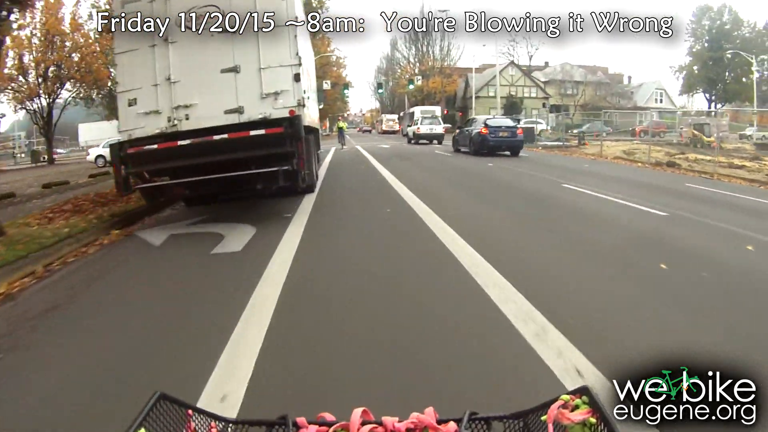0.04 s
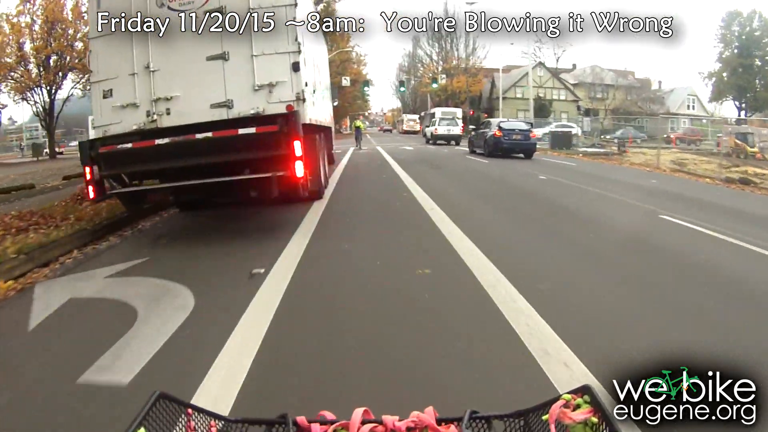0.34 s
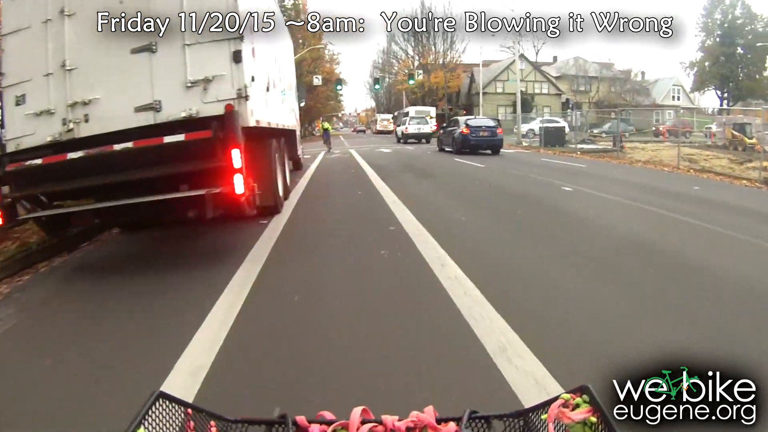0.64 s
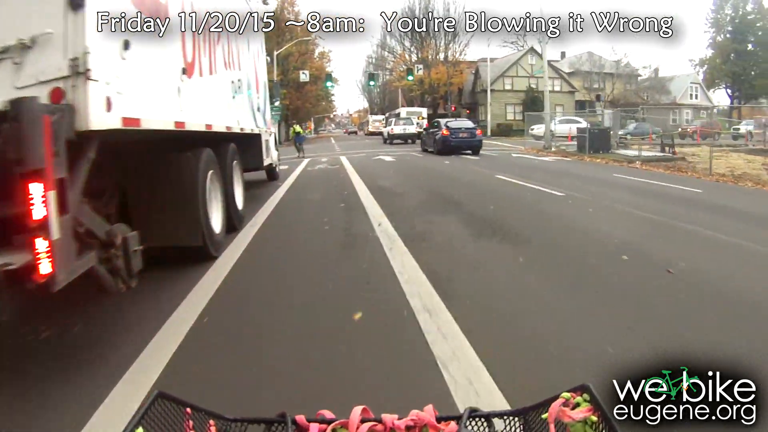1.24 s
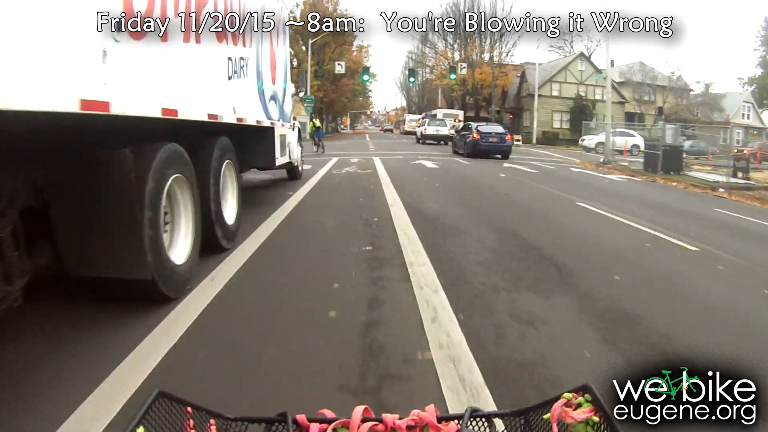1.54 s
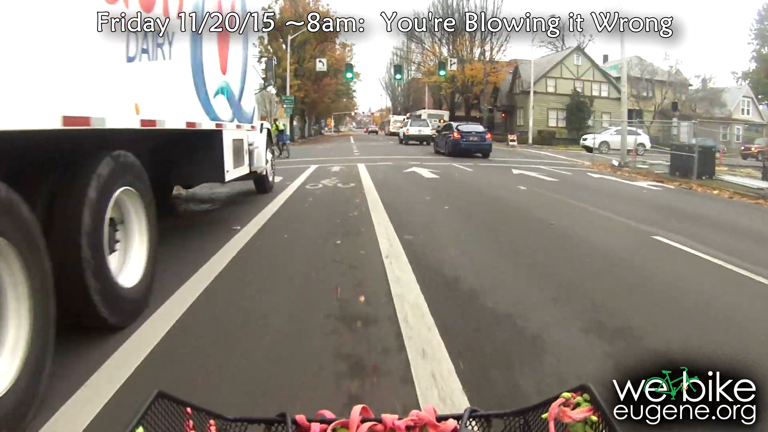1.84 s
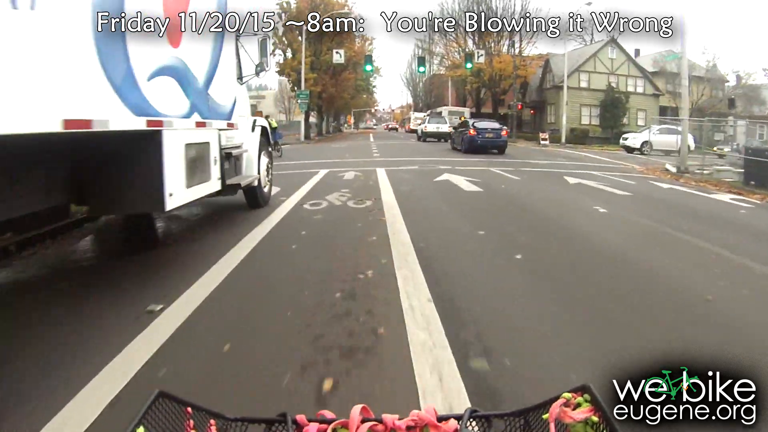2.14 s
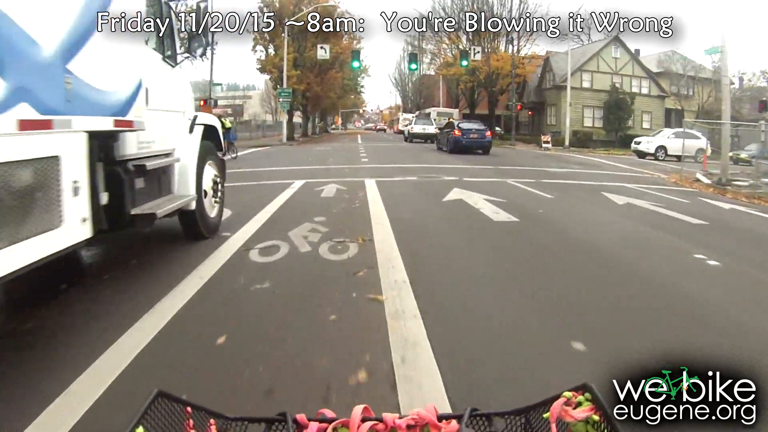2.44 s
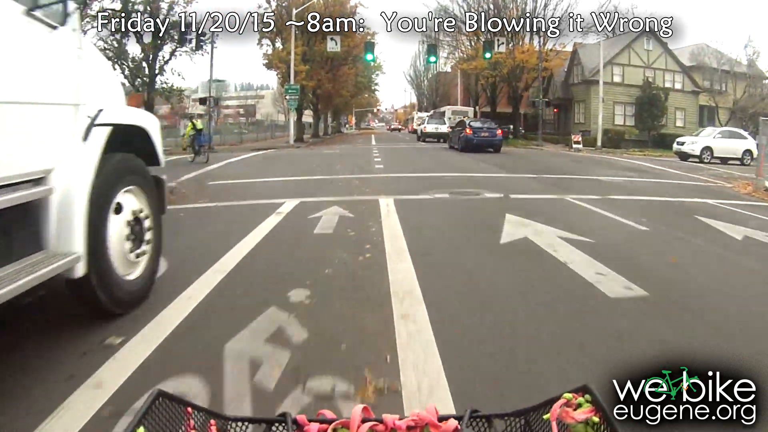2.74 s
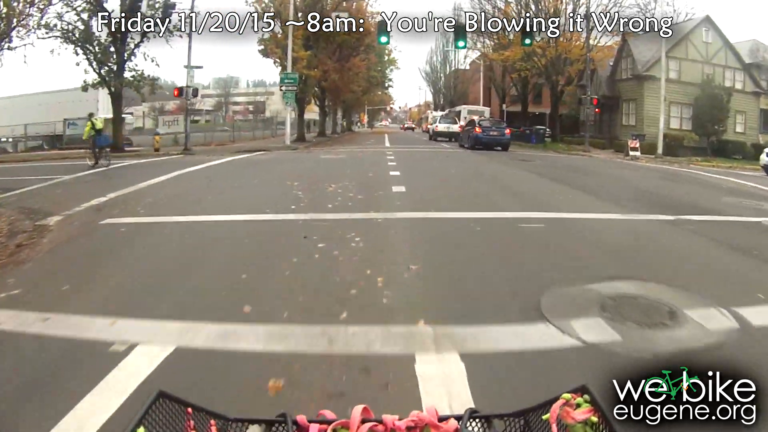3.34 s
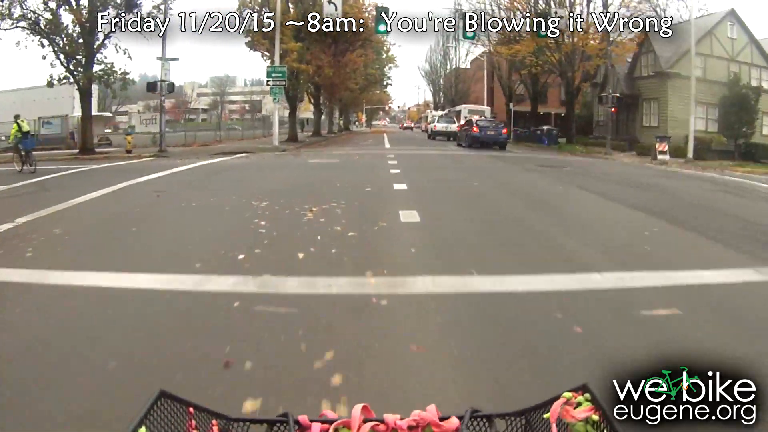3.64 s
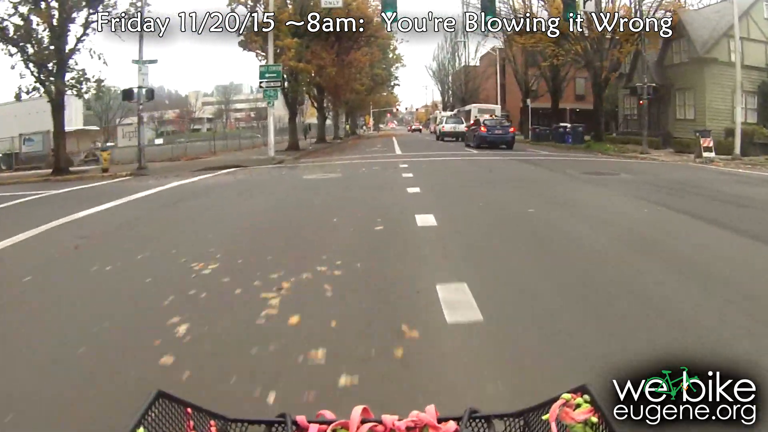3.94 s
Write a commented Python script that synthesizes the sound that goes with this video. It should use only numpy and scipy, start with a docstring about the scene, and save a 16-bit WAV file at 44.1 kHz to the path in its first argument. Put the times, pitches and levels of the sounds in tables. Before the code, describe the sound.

A bicycle ride's low wind rumble and hollow drone, passing a truck amid brief rattles.

```python
"""A low rumble and a hollow drone: a cased camera on a bicycle riding past a truck in street traffic.
Wind and road shake the mount, wind and engine noise boom in the case, tyres and traffic roar and hiss.
The truck's growl swells and fades. Bumps thump the mount; a loose plastic part clacks in short runs.
Fainter: metallic pings from the basket, fizz on the strongest shakes, two very high squeaks."""
import sys
import numpy as np
from scipy import signal
from scipy.fft import rfft, irfft
from scipy.io import wavfile
from scipy.ndimage import uniform_filter1d, minimum_filter1d

SR = 44100
rng = np.random.default_rng(int(sys.argv[2]) if len(sys.argv) > 2 else 0)


def store_wav(level_fs):
    """Save 16-bit WAV to argv[1]."""
    pcm = np.round(np.clip(np.atleast_2d(level_fs), -1, 1) * 32767)
    wavfile.write(sys.argv[1], SR, pcm.T.astype(np.int16))


N = 176400
T = np.arange(N) / SR

# Envelopes and spectra hold relative levels; spectra are densities.
# road roar envelope: t/s, level/dB
ROAR_ENVELOPE = [(0.0, -39), (0.23, -45.5), (0.7, -50.5), (1.09, -45.5), (1.82, -49), (2.14, -42),
                 (2.25, -41), (2.92, -41.5), (3.04, -37), (3.16, -47.5), (3.34, -53.5), (4.0, -50.5)]
# road roar: f/Hz, level/dB
ROAR_SPECTRUM = [(300, -19), (400, -6.5), (465, 2.5), (530, -1), (660, 1.5), (780, 0.5), (880, -9),
                 (1050, -18), (1500, -33.5)]
# tyre and traffic hiss envelope: t/s, level/dB
HISS_ENVELOPE = [(0, -43.5), (.2, -39), (.28, -46), (.55, -47.5), (.8, -46.5), (1.08, -42.5), (1.3, -46),
                 (1.65, -48), (2.05, -43), (2.25, -44.5), (2.45, -40.5), (2.75, -40), (3.07, -38),
                 (3.15, -48), (3.35, -50), (3.7, -48.5), (4, -49.5)]
# tyre and traffic hiss: f/Hz, level/dB
HISS_SPECTRUM = [(700, -22.5), (900, -12), (1010, -11.5), (1100, -5), (1350, -5.5), (1720, -1.5),
                 (2050, -1), (2600, -6), (2880, -7), (3400, -9.5), (3650, -14.5), (4040, -13), (4770, -24),
                 (5500, -16.5), (6300, -21), (7200, -29), (8700, -39), (10000, -34.5), (12500, -44),
                 (15000, -63.5)]
# case and mount resonances: f/Hz, width/Hz, level/dB re hiss
CASE_RESONANCES = [(455, 12, -14), (662, 47, -9), (757, 17, -14), (1685, 75, -9.5), (1977, 49, -11.5),
                   (2838, 70, -14.5), (5300, 80, -27.5)]
# high squeaks: t/s, length/s, level/dB
SQUEAK_EVENTS = [(1.53, .07, -74), (2.845, .078, -68)]
# truck engine: f/Hz, level/dB
GROWL_SPECTRUM = [(85, -17), (108, 0.5), (128, 1.5), (155, -16.5), (190, -18.5), (230, -1), (260, -10.5),
                  (288, -8.5), (310, -19), (335, -11.5), (400, -31.5)]
# case drone envelope: t/s, level/dB
DRONE_ENVELOPE = [(0, -20.5), (.08, -17.5), (.2, -19), (.27, -22.5), (.4, -27), (.75, -23.5), (1.25, -22.5),
                  (1.45, -27.5), (1.7, -29), (2.05, -20.5), (2.16, -16.5), (2.26, -26.5), (2.35, -12.5),
                  (2.48, -19.5), (2.8, -17), (3.05, -16), (3.15, -24.5), (3.35, -30), (3.7, -27.5),
                  (4, -26.5)]
# case drone: f/Hz, level/dB
DRONE_SPECTRUM = [(130, -28), (165, -26), (190, -7), (212, -1), (233, 3.5), (258, -6), (288, -8),
                  (306, -18.5), (334, -14), (400, -28.5), (520, -61)]
# fizz on strong shakes: f/Hz, level/dB
CRACKLE_SPECTRUM = [(1000, -14.5), (2200, 3), (4500, 1), (7000, 5), (10000, -5), (14000, -14), (15200, -28)]
# basket blows: t/s, level/dB
BASKET_HITS = [(.143, -37), (.9, -37), (1.181, -44), (1.352, -35.5), (1.531, -47), (2.967, -31),
               (3.614, -43)]
# basket modes: f/Hz, level/dB, t60/s
BASKET_MODES = [(2050, 0, .035), (2900, -3, .03), (4720, -7, .025), (5570, -4, .04), (7400, -13, .012),
                (10200, -19, .01), (13500, -24, .008)]
# mount rumble envelope: t/s, level/dB
RUMBLE_ENVELOPE = [(0, -18.5), (.12, -15), (.22, -13), (.3, -16.5), (.6, -20), (.8, -20), (.95, -12),
                   (1.25, -23), (1.55, -16.5), (1.8, -23), (2.2, -13.5), (2.5, -17.5), (2.7, -13.5),
                   (3.08, -13), (3.14, -19.5), (3.3, -15.5), (3.42, -20), (3.56, -17.5), (3.76, -21.5),
                   (3.83, -25.5), (4, -21.5)]
# mount rumble: f/Hz, level/dB
RUMBLE_SPECTRUM = [(12, -11.5), (25, -15.5), (40, -5), (54, -4.5), (70, 3), (82, -5), (102, -5.5),
                   (128, -9), (155, -28.5), (220, -42.5)]
# road jolts: t/s, level/dB, f/Hz
ROAD_JOLTS = [(0.205, 2, 96), (0.227, -15, 96), (0.321, -1.5, 87), (0.387, -4, 72.2), (0.513, 1, 72.2),
              (1.148, -2, 68.3), (1.177, 3.5, 70), (1.346, -2, 76), (1.386, -0.5, 61.2), (3.067, -3.5, 95),
              (3.527, -12.5, 64.4), (3.698, -5.5, 66.4)]
# loose part blows: t/s, relative level/dB
PART_HITS = [(0.2605, -14.5), (1.4228, 0.5), (1.48, -0.5), (3.1292, -0.5), (3.1902, -3), (3.2489, -1.5),
             (3.2992, -16), (3.47, -13.5), (3.5312, -17.5), (3.5376, -11), (3.5942, -2), (3.7088, -22),
             (3.768, -21)]
# loose part modes: f/Hz, relative level/dB, t60/s
PART_MODES = [(640, -29, .022), (830, -30, .022), (1230, -22, .015), (1900, -14, .013), (2330, -5.5, .011),
              (3200, -9.5, .011), (4080, -14, .01), (4650, -7, .006), (5560, -28, .028), (6650, -27, .005),
              (9900, -33, .003), (2030, -36, .08), (4960, -36, .035)]
# contact crack: f/Hz, level/dB
CRACK_SPECTRUM = [(600, -24), (1300, -6.5), (2300, 3), (3200, 0.5), (4700, -9.5), (5700, -7.5),
                  (7000, -15.5), (8500, -25.5), (11000, -25.5), (15000, -50)]
# part's scrape and mount's shiver: f/Hz, level/dB
SHIVER_SPECTRUM = [(400, -24), (700, -14), (1200, 2), (2150, 6), (3300, -11.5), (5200, -31), (7500, -40),
                   (14000, -63)]


def undb(db):
    return 10 ** (np.asarray(db) / 20)


def curve(rows):
    """Gain over time from t/s, level/dB rows."""
    return undb(np.interp(T, *np.array(rows).T))


def noise(spectrum):
    """Unit-rms noise from f/Hz, level/dB rows; 40 dB/octave roll-off outside."""
    hz, db = np.array(spectrum).T
    octave = np.log2(np.maximum(np.arange(N // 2 + 1) * SR / N, 1))
    points = np.log2(hz)
    outside = np.abs(octave - np.clip(octave, points[0], points[-1]))
    gain = undb(np.interp(octave, points, db) - 40 * outside)
    x = irfft(rfft(rng.standard_normal(N)) * gain, N)
    return x / np.sqrt(np.mean(x ** 2))


def steady(x, span_s):
    """Level out swells slower than span_s; keep the flutter."""
    return x / np.sqrt(uniform_filter1d(x ** 2, int(span_s * SR)) + 1e-9)


def walk(rate_hz):
    """Random wander, spread near 1."""
    knots = rng.standard_normal(1000)
    return np.interp(T * rate_hz, np.arange(len(knots)), knots)


def fade(t, t60_s):
    return np.exp(-np.log(1000) * t / t60_s)


def add(out, start_s, sound):
    i = max(int(start_s * SR), 0)
    out[i:i + len(sound)] += sound[:N - i]


def strikes(hits, modes, attack_s=.0009, detune=.0031):
    """Each blow rings damped modes of alternating sign, slightly detuned at random."""
    out, t = np.zeros(N), T[:SR // 8]
    hz, db, t60_s = np.array(modes).T[:, :, None]
    sign = (-1) ** np.arange(len(hz))[:, None]
    attack = 1 - np.exp(-(t / attack_s) ** 2)
    for start_s, hit_db in hits:
        detuned_hz = hz * (1 + detune * rng.standard_normal(hz.shape))
        ring = sign * undb(db) * fade(t, t60_s) * np.sin(2 * np.pi * detuned_hz * t)
        add(out, start_s, undb(hit_db) * attack * ring.sum(axis=0))
    return out


def squeaks(pitch_hz=13020, wander_hz=200):
    """Faint, brief, very high squeaks, perhaps a brake."""
    gate = np.zeros(N)
    for start_s, length_s, db in SQUEAK_EVENTS:
        add(gate, start_s, undb(db) * signal.windows.tukey(int(length_s * SR)))
    hz = pitch_hz + wander_hz * walk(900)
    return gate * np.sin(2 * np.pi * np.cumsum(hz) / SR)


def case_resonances(waver_db=.5):
    """Passing noise excites narrow bands in case and mount; each wavers alone."""
    out = np.zeros(N)
    for hz, width_hz, db in CASE_RESONANCES:
        points_hz = hz + width_hz * np.array([-3, -.5, 0, .5, 3])
        band = noise(list(zip(points_hz, [-30, -3, 0, -3, -30])))
        out += band * undb(db + waver_db * walk(18))
    return out


def street(roar_trim_db=.5, hiss_trim_db=-.69, flutter_db=1.4):
    """Tyres and traffic: low roar plus case-coloured hiss, both fluttering in the wind."""
    flutter = undb(flutter_db * walk(28.44))
    hiss = (noise(HISS_SPECTRUM) + case_resonances()) * curve(HISS_ENVELOPE) * undb(hiss_trim_db)
    roar = noise(ROAR_SPECTRUM) * curve(ROAR_ENVELOPE) * undb(roar_trim_db)
    return flutter * (roar + hiss)


def truck(closest_s=2.276, closest_db=-19, speed_m_s=6.5, gap_m=.85):
    """Rough engine growl, scaled by 1/distance as the bike passes."""
    distance_m = np.hypot(gap_m, speed_m_s * (T - closest_s))
    return steady(noise(GROWL_SPECTRUM), span_s=.088) * undb(closest_db) * gap_m / distance_m


def case_drone(trim_db=-.25):
    """Wind and engine noise boom in the hollow case."""
    return steady(noise(DRONE_SPECTRUM), span_s=.12) * curve(DRONE_ENVELOPE) * undb(trim_db)


def crackle(shake, threshold=.15, gain_db=-40, grain_db=3):
    """Faint fizz while the shake exceeds the threshold."""
    excess = uniform_filter1d(np.maximum(np.abs(shake) - threshold, 0), size=300)
    return undb(gain_db) * excess * noise(CRACKLE_SPECTRUM) * undb(grain_db * walk(220))


def basket_pings():
    """Tiny blows ring the metal basket."""
    return strikes(BASKET_HITS, BASKET_MODES)


def mount_rumble(attack_s=.004, t60_s=.17):
    """Wind and road shake the mount; each jolt swings it for a few cycles."""
    out = steady(noise(RUMBLE_SPECTRUM), span_s=.12) * curve(RUMBLE_ENVELOPE)
    t = T[:SR // 4]
    envelope = (1 - np.exp(-t / attack_s)) * fade(t, t60_s)
    for start_s, db, hz in ROAD_JOLTS:
        add(out, start_s, undb(db) * envelope * np.sin(2 * np.pi * hz * t))
    return out


def part_clacks(slip_s=.005, slip_db=-27, crack_attack_s=.0009, crack_db=-8.5,
                ring_db=4.5, bounce_s=.0024, bounce_db=-13.5, shiver_db=-25):
    """The loose plastic part scrapes, strikes, rings and bounces once; the mount shivers after."""
    shiver, crack, t = np.zeros(N), np.zeros(N), T[:SR // 8]
    slip_shape = np.sqrt(np.linspace(0, 1, int(slip_s * SR)))
    crack_shape = np.minimum(t / crack_attack_s, 1) * fade(t, t60_s=.0086)
    bounces = []
    for start_s, db in PART_HITS:
        add(shiver, start_s - slip_s, undb(db + slip_db) * slip_shape)
        add(crack, start_s, undb(db + crack_db) * crack_shape)
        add(shiver, start_s, undb(db + shiver_db) * fade(t, t60_s=.07))
        bounces.append((start_s + bounce_s * rng.uniform(.758, 1.225), db + bounce_db))
    ring = undb(ring_db) * strikes(list(PART_HITS) + bounces, PART_MODES)
    return ring + noise(SHIVER_SPECTRUM) * shiver + noise(CRACK_SPECTRUM) * crack


def scene():
    """Mono sum at the microphone."""
    shake = mount_rumble()
    bike = shake + part_clacks() + basket_pings() + crackle(shake)
    return (bike + case_drone() + truck() + street() + squeaks())[None]


def record(dry, ceiling=.92, cutoff_hz=15500):
    """Camera: smoothed peak limiter, then a steep low-pass."""
    gain = minimum_filter1d(ceiling / np.maximum(np.abs(dry), ceiling), size=601)
    limited = dry * uniform_filter1d(uniform_filter1d(gain, size=301), size=301)
    lowpass = signal.ellip(8, .2, 70, cutoff_hz, fs=SR, output="sos")
    return signal.sosfilt(lowpass, limited)


dry = scene()
out = record(dry)
store_wav(out)
```